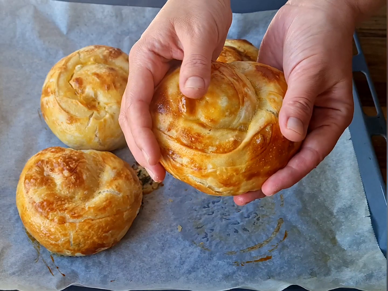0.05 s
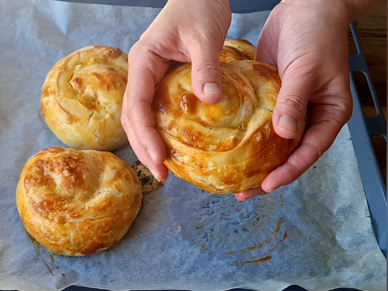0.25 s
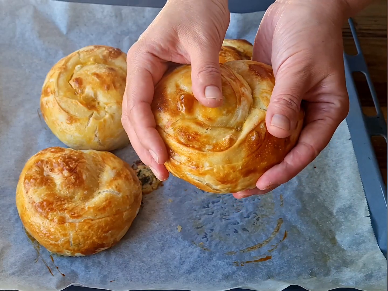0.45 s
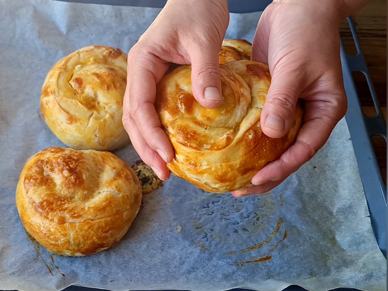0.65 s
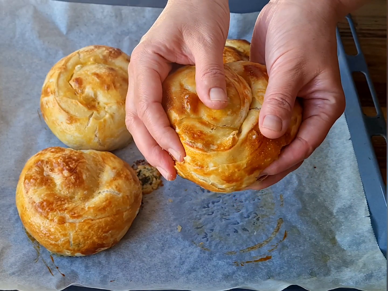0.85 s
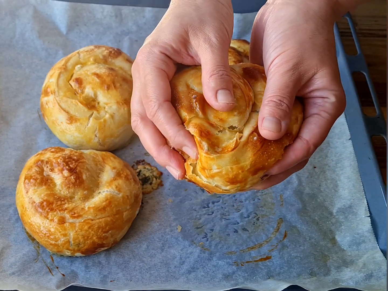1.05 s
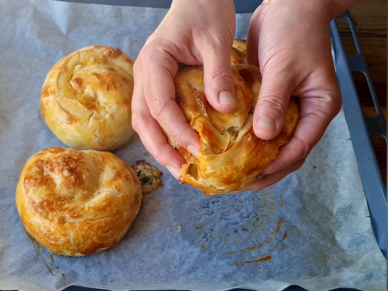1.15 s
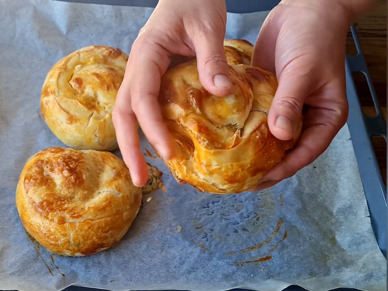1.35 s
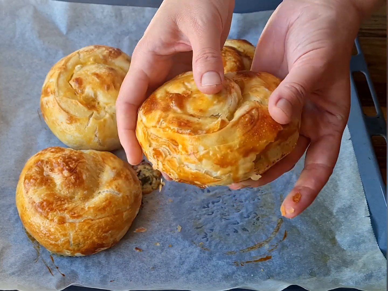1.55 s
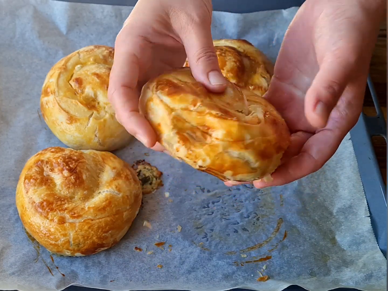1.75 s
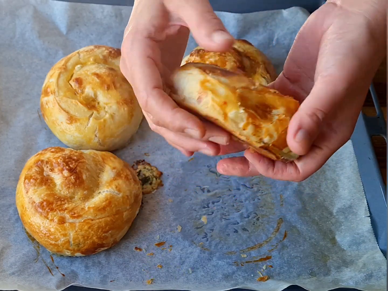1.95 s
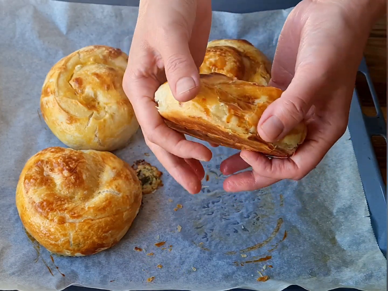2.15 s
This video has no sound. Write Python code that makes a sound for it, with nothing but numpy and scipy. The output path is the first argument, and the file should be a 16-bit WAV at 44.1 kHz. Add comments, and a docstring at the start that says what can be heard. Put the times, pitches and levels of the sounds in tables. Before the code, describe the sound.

A flaky pastry crust crackles close up as hands squeeze it. Small snaps start around 0.2 seconds, growing into denser, louder crunching from 0.65 to 1.1. After a lull with one sharp crack near 1.25, another cluster comes from 1.45 to 1.9 as the pastry is turned, thinning by 2.1. Faint hand rubbing and soft low bumps lie underneath, over a quiet kitchen's low hum.

```python
"""A quiet kitchen, close up: two hands squeeze a flaky baked pastry, then let go and turn it over.
The crust breaks in sharp cracks, each a run of tiny fractures that sets a flake ringing, over a fine
crackle of crumbling layers and dull knocks from the soft body. The moving hands rub, rumble and bump
softly; the small room answers over a low steady hum."""
import sys
import numpy as np
from scipy import signal
from scipy.fft import rfft, irfft, next_fast_len
from scipy.io import wavfile
from scipy.ndimage import uniform_filter1d

SR = 44100
rng = np.random.default_rng(int(sys.argv[2]) if len(sys.argv) > 2 else 0)


def unload_wav(signal):
    """Save mono or channel-first audio to the path in sys.argv[1] as 16-bit WAV at rate SR, clipped to [-1, 1]."""
    wavfile.write(
        sys.argv[1],
        SR,
        np.round(np.clip(np.atleast_2d(signal).T, -1, 1) * 32767).astype(np.int16),
    )


N = 97020
TIME = np.arange(N) / SR


def cracks():
    """The crust breaks in sharp snaps, each with its own body, sparkle and place between the ears."""
    # (time [s], level [dB], body [dB], sparkle [dB], length [ms], left over right [dB], flake pitch [Hz])
    hits = [(0.1096, -59.5, -27, 1, 2.3, 0, 8100), (0.1985, -56, -30, -11, 0.98, 9, 8000),
            (0.2234, -39, -23, -9, 0.18, 4, 5640), (0.2488, -37.5, -1, 5.5, 1.6, 7, 5300),
            (0.2729, -35.5, -4.5, 3, 2.8, 0, 8700), (0.2840, -43, -3, 1, 1.4, 9, 7340),
            (0.307, -43, 0, -11, 1.3, 4, 5370), (0.3444, -41, -4, 6, 1, 5, 8100),
            (0.3633, -41.5, 4, -10, 1.1, 3, 3460), (0.3665, -40.5, -16, -4, 0.7, -3, 7600),
            (0.3862, -54, -16, 4, 0.4, 2, 8040), (0.395, -28, -11.5, -8, 1.6, 1, 6700),
            (0.4294, -38, -9, -3, 0.62, 1, 13100), (0.4434, -38, -3.5, -5, 2.4, 2.5, 7800),
            (0.48, -35.5, -15, 1.5, 1.1, -1.5, 11500), (0.4914, -44, -12, 0, 0.64, 4, 7000),
            (0.5102, -41, -15, -1, 0.76, 3.5, 8100), (0.5212, -47.5, -5, -4, 0.8, 7, 4960),
            (0.6191, -35, -25, 2, 0.94, 1, 5000), (0.659, -34.5, 8, 10.5, 1.9, 12, 11600),
            (0.662, -28.5, -16, -5, 2.5, -0.5, 5270), (0.6648, -26, -3, 15, 2.3, -10, 14200),
            (0.6704, -31.5, -7, 3, 4.9, 6, 5300), (0.677, -29.5, -14, 4, 5.1, -3, 4940),
            (0.681, -27.5, 0, 9, 3, 3, 3240), (0.699, -28.5, -9, 5, 3.6, 0, 13600),
            (0.7197, -34, -2, 6.5, 0.9, 2, 3130), (0.7411, -33, -7, 4.5, 0.74, -1, 10700),
            (0.7962, -42, -8, -1, 0.6, -2, 7500), (0.8082, -39, -22, 3, 0.82, 10, 11500),
            (0.823, -32.5, -24, 4, 1.3, -1, 6900), (0.8333, -33, -26, 4, 3.4, 6, 10700),
            (0.838, -34.5, -22, 7, 1.4, -7, 11500), (0.8635, -29.5, -16.5, 4.5, 1.4, 3, 4700),
            (0.8928, -41, -4, 0, 4.1, 2, 7600), (0.8977, -37.5, -12, 3, 1.7, 3, 5100),
            (0.91, -36, -12, 3, 1.1, 5, 5200), (0.928, -43, -11, 6, 0.7, 0, 11000),
            (0.9428, -35.5, -18, 9, 4.1, 1, 8200), (0.9485, -38, -12, 4, 2.2, 1, 12200),
            (0.9682, -29, -7.5, 10.5, 3, 2, 11500), (0.982, -34, -10, 5, 4.7, 2.5, 12000),
            (0.9907, -36.5, -11, 3.5, 2.9, 4, 5100), (1.0355, -33, -14, -1.5, 0.59, 6, 5050),
            (1.0385, -30.5, -4.5, 4.5, 2.2, -1, 5700), (1.0418, -31, -7, 5, 2.2, 1, 11300),
            (1.0502, -37, 0.5, 9, 0.6, 14, 5960), (1.2351, -24.5, -26, 12, 1.1, 2, 12700),
            (1.2408, -30.5, -42, -4.5, 0.73, 3, 7100), (1.2631, -53, -30, 7, 0.6, 3, 7450),
            (1.2938, -43.5, -30, 0, 1.4, -1, 7800), (1.298, -42.5, -41, 2, 1.2, 2, 12500),
            (1.4448, -37.5, -25, 10, 2.2, 2, 10700), (1.4744, -28, 1, 11.5, 1.2, 5.5, 12240),
            (1.4833, -33.5, -7, 0, 3.3, 3, 4580), (1.4847, -35, -6, -17, 2.6, -3, 7350),
            (1.5057, -58, -6, 6, 0.65, 2, 12500), (1.512, -25, -15, -2, 1.8, 1.5, 12600),
            (1.5211, -24.5, -13, 4, 2.2, 1.5, 12200), (1.5928, -36.5, 2, 2, 1.6, 13, 10900),
            (1.5942, -26.5, -7.5, 6.5, 2, -4, 7100), (1.6117, -28.5, -6.5, 1, 2.1, -3, 15000),
            (1.616, -37, 1, 0, 4.7, -2, 7300), (1.6203, -38, -5, 5, 0.83, 6, 4500),
            (1.6251, -29.5, -8.5, -9, 4.2, 4, 10000), (1.6348, -27.5, -5, -3, 0.96, 0, 5600),
            (1.677, -42, -8, 0, 1.5, 5, 11000), (1.6789, -27, -6.5, 5, 0.85, -8, 14100),
            (1.685, -33.5, -8.5, 0, 2.8, 17, 12600), (1.71, -38, 5.5, 2, 1.2, 6, 12000),
            (1.7576, -41, -23, 0, 0.97, 1, 7540), (1.7889, -45, -17, 5, 0.27, 4, 9000),
            (1.799, -35.5, -22, 3.5, 2.7, 0, 8100), (1.8312, -44.5, -6, 1, 1.6, 2, 13800),
            (1.8599, -28, -12.5, 8, 1.3, -0.5, 9640), (1.8622, -33.5, -5, 6, 2.5, 9.5, 12100),
            (1.9272, -36, 2, 6, 1.4, 3.5, 8200), (1.9304, -41.5, -1, 6, 2.5, 4, 12500),
            (2.054, -43, -3.5, 4.5, 7, 7, 15100), (2.0621, -45, -22, 7, 2.6, -2, 7700),
            (2.0992, -40, -20, 10, 2.4, -3, 12000)]
    # tone common to all cracks: (frequency [Hz], gain [dB])
    crust_tone = [(300, -2), (600, -2.5), (900, -1), (1400, -3.5), (2100, 4), (2550, -0.5), (3100, 6),
                  (3900, 4), (4800, 6.5), (5700, 2.5), (7800, 5), (8700, -1.5), (10300, 2), (12500, 1),
                  (14000, -1), (16000, -1.5)]
    # the breaking spot wanders across the pastry: (time [s], lag of the left channel [samples])
    wander = [(.25, 0.5), (.35, 3.5), (.7, 2.5), (1.0, 1), (1.5, 0.5), (1.62, 4), (1.75, 1.04)]
    body_below_hz, sparkle_above_hz, trim_db = 3770, 9400, 0.5
    out = np.zeros((2, N + SR))
    for s, db, body_db, sparkle_db, length_ms, pan_db, flake_hz in hits:
        tone = lambda hz: (at_hz(crust_tone, hz) + body_db / (1 + (hz / body_below_hz) ** 6)
                           + sparkle_db / (1 + (sparkle_above_hz / hz) ** 8))
        lag = np.interp(s, *np.transpose(wander))
        burst = colour(fracture(length_ms, lag, flake_hz), tone)
        burst = energy_one(burst) * np.sqrt(SR / 1000)  # the energy of one millisecond at rms 1
        gains = from_db(trim_db + db + np.array([[pan_db], [-pan_db]]) / 2)
        start = int(s * SR)
        out[:, start:start + burst.shape[1]] += burst * gains
    return out[:, :N]


def fracture(length_ms, lag, flake_hz, size=700):
    """One crack in stereo: a dying run of tiny breaks and the brief ring of the freed flake."""
    rise_ms, decay_ms = .28, .75 * max(length_ms, .2)
    ring_ms, flake_db = .28, -5
    shared = .58  # share of the energy common to both channels
    ms = TIME[:size] * 1000
    rise = 1 - np.exp(-ms / rise_ms)
    breaks = energy_one(rng.standard_normal((3, size)) * rise * np.exp(-ms / decay_ms))
    flake = energy_one(np.sin(2 * np.pi * flake_hz * TIME[:size]) * rise * np.exp(-ms / ring_ms))
    common = energy_one(breaks[2] + from_db(flake_db) * flake)
    delays = np.maximum([[lag], [-lag]], 0)
    common = irfft(rfft(common) * np.exp(-2j * np.pi * np.fft.rfftfreq(size) * delays))
    return energy_one(np.sqrt(shared) * common + np.sqrt(1 - shared) * breaks[:2])


def crumbling():
    """Countless small layers snap at random, most of them faint; a harder squeeze breaks more a second."""
    # crumbling under the fingers: (time [s], level [dB])
    squeeze = [(0, -86), (.19, -71.5), (.26, -53.5), (.40, -50.5), (.465, -53), (.5, -55), (.59, -56),
               (.64, -47), (.68, -45.5), (.77, -56), (.84, -48), (.93, -53.5), (.98, -51), (1.06, -43),
               (1.13, -53), (1.22, -60.5), (1.3, -55), (1.355, -62.5), (1.385, -53), (1.46, -58),
               (1.49, -42), (1.58, -57), (1.62, -38.5), (1.69, -48.5), (1.75, -49.5), (1.84, -55),
               (1.92, -52), (1.98, -60), (2.04, -57), (2.09, -54), (2.2, -64.5)]
    # tone of the crackle: (frequency [Hz], gain [dB])
    crumb_tone = [(300, -3), (600, -16.5), (900, -3.5), (1400, -5.5), (2000, -3), (2550, -8), (3100, -3),
                  (3800, -1.5), (4800, 0), (6000, -1.5), (7800, -2.5), (8800, -5.5), (10500, -1),
                  (12500, -0.5), (16000, 0)]
    usual_snaps_per_s, usual_db = 1000, -55.5
    spread_db, decay_s, trim_db = 2, .00055, -2.4
    rustle = .089  # smooth sliding of the layers, relative to the power of the snaps
    vigour = level(squeeze)
    snaps_per_s = usual_snaps_per_s * (vigour / from_db(usual_db)) ** .65
    onsets = rng.random(N) < snaps_per_s / SR
    sizes = from_db(spread_db * np.minimum(rng.exponential(1, N), 4))
    fade = np.exp(-2 / (decay_s * SR))
    power = signal.lfilter([1], [1, -fade], onsets * sizes ** 2 + 1e-12)
    power /= uniform_filter1d(power, size=1800) + 1e-9  # levelled, so vigour sets the loudness
    noise = rng.standard_normal((2, N)) + .5 * rng.standard_normal(N)
    grains = colour(noise * np.sqrt(power + rustle), lambda hz: at_hz(crumb_tone, hz))
    return from_db(trim_db) * vigour * rms_one(grains)


def knocks():
    """Short dull thuds where the soft body of the pastry gives way or meets a finger."""
    # (time [s], level [dB], decay [s])
    thuds = [(0.663, -56, 0.0083), (0.676, -43, 0.0063), (0.719, -46.5, 0.0071), (0.968, -45, 0.005),
             (1.041, -54, 0.046), (1.512, -50, 0.011), (1.593, -53, 0.013), (1.799, -48.5, 0.011),
             (1.927, -41.5, 0.0039)]
    # tone of the soft body: (frequency [Hz], gain [dB])
    thud_tone = [(100, -8.5), (300, -12.5), (480, 6), (620, -1.5), (850, 0.5), (1300, -0.5), (2000, -5.5),
                 (4000, -14), (16000, -63)]
    envelope = sum(from_db(db) * (TIME >= s) * np.exp(-np.maximum(TIME - s, 0) / decay_s)
                   for s, db, decay_s in thuds)
    return envelope * stereo_noise(thud_tone)


def hollow(crust):
    """The crust rings on briefly, as between cupped hands, lower once they open."""
    # resonances: (start [s], end [s], pitch [Hz], width [Hz], gain [dB])
    cavities = [(0.604, 1.1, 3140, 400, -3), (1.415, 1.587, 2220, 240, 5)]
    out = np.zeros_like(crust)
    for start, end, hz, width_hz, db in cavities:
        gate = np.interp(TIME, [start, start + .02, end, end + .02], [0, 1, 1, 0])
        radius = np.exp(-np.pi * width_hz / SR)
        feedforward = (1 - radius ** 2) / 2 * np.array([1, 0, -1])
        feedback = [1, -2 * radius * np.cos(2 * np.pi * hz / SR), radius ** 2]
        out += from_db(db) * signal.lfilter(feedforward, feedback, crust * gate)
    return out


def rumble():
    """The moving hands make a deep rumble, a little to the right."""
    # (time [s], level [dB])
    movement = [(0, -70), (.5, -64), (.58, -61), (.72, -64), (.86, -53), (.97, -62), (1.33, -74),
                (1.4, -60), (1.58, -57.5), (1.75, -68), (1.86, -50.5), (1.95, -98), (2.2, -59)]
    return level(movement) * wavering_tone(hz=42.8, width_hz=16.7) * from_db([[-1.7], [1.7]])


def bumps():
    """The pastry bumps against the palm: low thumps with a soft attack."""
    # (time [s], gain [dB], pitch [Hz], decay [s])
    thumps = [(0.276, -43, 65, 0.02), (1.773, -45, 89.8, 0.06), (1.844, -37, 68, 0.016)]
    rise_s = .024
    out = np.zeros(N)
    for s, db, hz, decay_s in thumps:
        age = np.maximum(TIME - s, 0)
        envelope = (1 - np.exp(-age / rise_s)) * np.exp(-age / decay_s)
        out += from_db(db) * envelope * wavering_tone(hz, width_hz=24, window=1500)
    return out


def rubbing():
    """Skin rubs on soft dough: a muffled noise that swells and sinks."""
    # (time [s], level [dB])
    strokes = [(0, -72), (.3, -58), (.57, -65.5), (.68, -56), (.78, -59), (.93, -58.5), (1.0, -54),
               (1.1, -64.5), (1.25, -64.5), (1.42, -62), (1.52, -61.5), (1.8, -61.5), (1.95, -61),
               (2.2, -66.5)]
    # tone of the friction: (frequency [Hz], gain [dB])
    rub_tone = [(150, -1), (300, 4), (500, 3.5), (630, -2.5), (900, -2), (1500, -7), (3000, -25),
                (16000, -71)]
    return level(strokes) * stereo_noise(rub_tone)


def kitchen(crust):
    """Direct sound, early scatter off hands and tray, and a short room tail, together neutral in tone."""
    scatter_decay_s, scatter_db = .005, -9
    t60_s, tail_rise_s, tail_top_hz, tail_db = .21, .00062, 7700, -9.5
    t = TIME[:SR // 2]
    bins_hz = np.fft.rfftfreq(len(t), 1 / SR)
    scatter = energy_one(rng.standard_normal((2, len(t))) * np.exp(-t / scatter_decay_s) * (t > .001))
    tail = rng.standard_normal((2, len(t))) * from_db(-60 * t / t60_s) * (1 - np.exp(-t / tail_rise_s))
    tail = energy_one(signal.sosfilt(signal.butter(1, tail_top_hz, fs=SR, output="sos"), tail))
    responses = (t == 0) + from_db(scatter_db) * scatter + from_db(tail_db) * tail
    out = []
    for channel, response in zip(crust, responses):
        ripple = uniform_filter1d(np.abs(rfft(response)) ** 2, size=120)
        flatten = lambda hz: -10 * np.log10(np.interp(hz, bins_hz, ripple / ripple.mean()))
        out.append(signal.fftconvolve(channel, colour(response, flatten))[:N])
    return np.array(out)


def room_tone():
    """A low steady hum in a bed of dark noise."""
    # tone of the quiet room: (frequency [Hz], gain [dB])
    bed_tone = [(25, -9.5), (42, -2.5), (65, -2.5), (95, -1), (130, -2), (190, -6), (280, 0.5), (400, -13),
                (510, -8), (650, -11.5), (920, -11), (1250, -20.5), (1650, -21.5), (2500, -39), (6000, -40),
                (16000, -38)]
    hum = from_db(-66.5) * wavering_tone(hz=290, width_hz=41)
    return hum + from_db(-58.5) * stereo_noise(bed_tone)


def wavering_tone(hz, width_hz, window=4000):
    """Narrow noise with its swells evened out over a window of samples; the pitch wanders; rms 1."""
    edges_hz = [max(hz - width_hz / 2, 10), hz + width_hz / 2]
    band = signal.butter(2, edges_hz, "band", fs=SR, output="sos")
    tone = rms_one(signal.sosfilt(band, rng.standard_normal(N + SR))[SR:])  # one second to settle
    return rms_one(tone / np.sqrt(uniform_filter1d(tone ** 2, size=window) + .1))


def stereo_noise(spectrum):
    """Coloured noise, narrow in the bass and wider in the treble; rms 1."""
    # stereo image: (frequency [Hz], left-right correlation [0 to 1])
    likeness = [(40, 0.78), (150, 0.95), (350, 0.66), (700, 0.39), (1500, 0.038), (3000, 0.58),
                (6000, 0.046), (16000, .05)]
    mid_db = lambda hz: at_hz(spectrum, hz) + 10 * np.log10(1 + at_hz(likeness, hz))
    side_db = lambda hz: at_hz(spectrum, hz) + 10 * np.log10(1 - at_hz(likeness, hz))
    mid = colour(rng.standard_normal(N), mid_db)
    side = colour(rng.standard_normal(N), side_db)
    return rms_one(np.array([mid + side, mid - side]))


def colour(x, gain_db):
    """Minimum-phase EQ along the curve gain_db(hz), so nothing rings ahead of an attack."""
    size = next_fast_len(2 * x.shape[-1], real=True)
    size += size % 2
    hz = np.maximum(np.fft.rfftfreq(size, 1 / SR), 1)
    cepstrum = irfft(np.log(from_db(gain_db(hz))))
    cepstrum[1:size // 2] *= 2
    cepstrum[size // 2 + 1:] = 0
    return irfft(rfft(x, size) * np.exp(rfft(cepstrum)))[..., :x.shape[-1]]


def at_hz(points, hz):
    """Read a curve on a log-frequency axis."""
    frequencies, values = np.transpose(points)
    return np.interp(np.log(hz), np.log(frequencies), values)


def level(rows):
    """A fader curve (time [s], level [dB]) as a gain for every sample."""
    return from_db(np.interp(TIME, *np.transpose(rows)))


def from_db(db):
    """Decibels to gain."""
    return 10 ** (np.asarray(db) / 20)


def rms_one(x):
    """Scale to rms 1."""
    return x / np.sqrt(np.mean(x ** 2) + 1e-20)


def energy_one(x):
    """Scale each channel to energy 1."""
    return x / np.sqrt(np.sum(x ** 2, axis=-1, keepdims=True) + 1e-20)


def scene():
    """The crust sounds in the kitchen; the hands stay dry, over the room tone."""
    crust = cracks() + crumbling() + knocks()
    return kitchen(crust + hollow(crust)) + rumble() + bumps() + rubbing() + room_tone()


def record(dry):
    """Steep cuts take off the deepest bass and the very top."""
    low_cut = signal.butter(6, 36, "high", fs=SR, output="sos")
    high_cut = signal.ellip(10, .3, 80, 15900, fs=SR, output="sos")
    return signal.sosfilt(high_cut, signal.sosfilt(low_cut, dry))


dry = scene()
out = record(dry)
unload_wav(out)
```